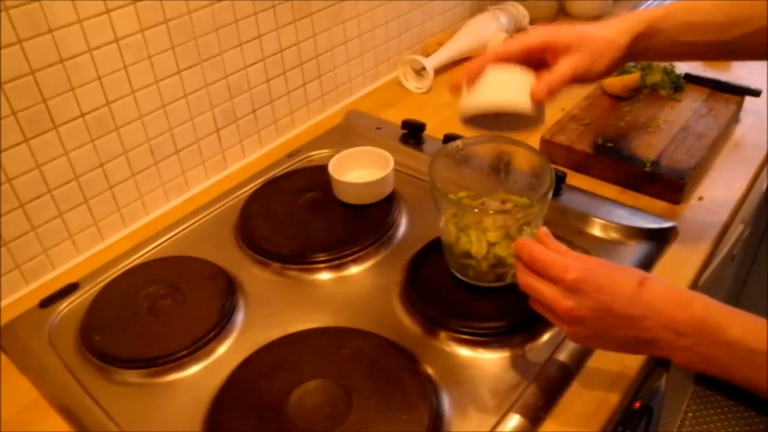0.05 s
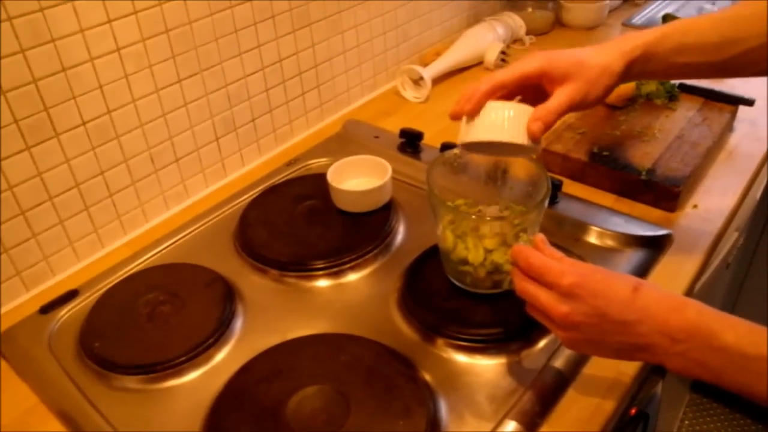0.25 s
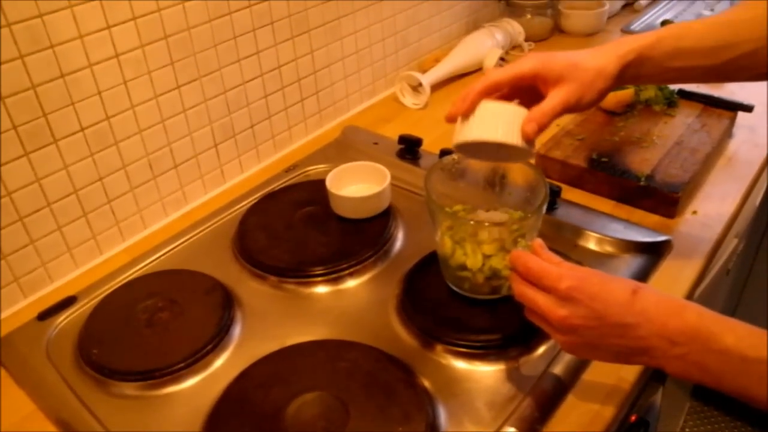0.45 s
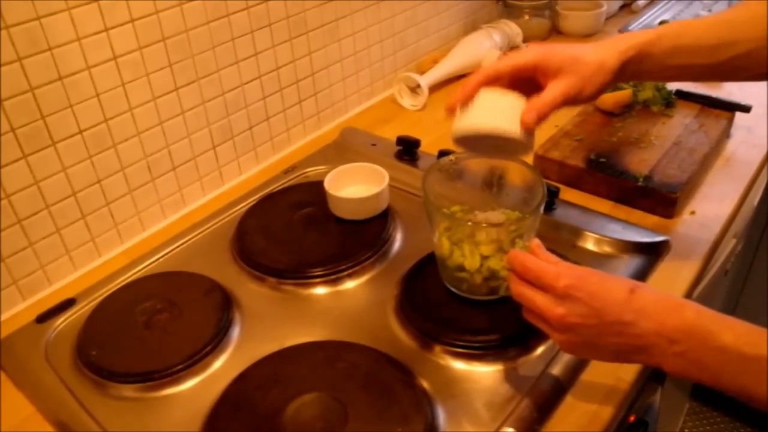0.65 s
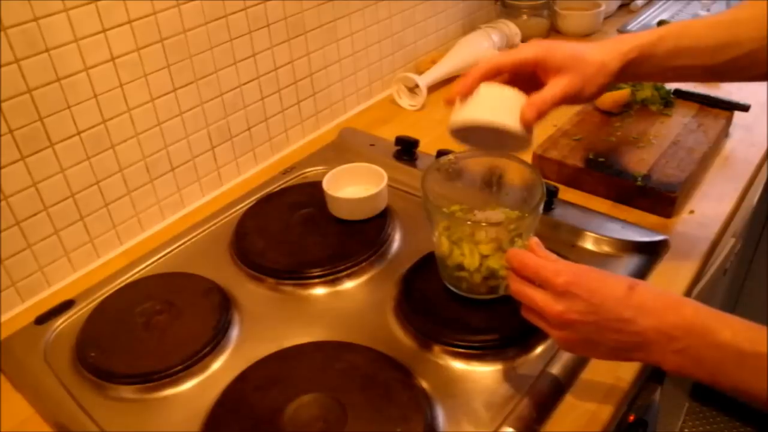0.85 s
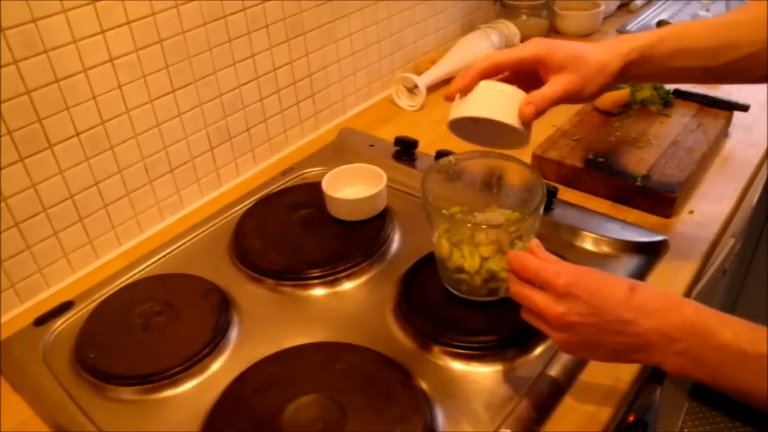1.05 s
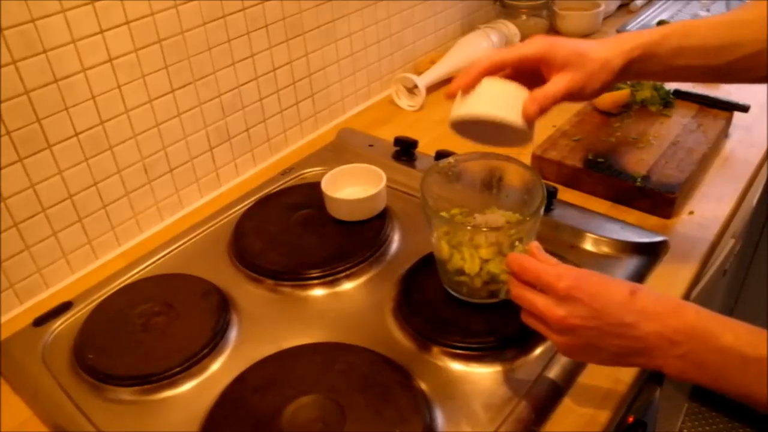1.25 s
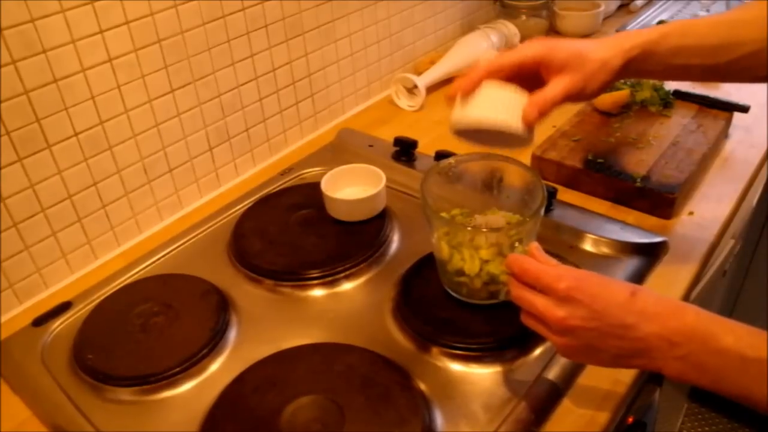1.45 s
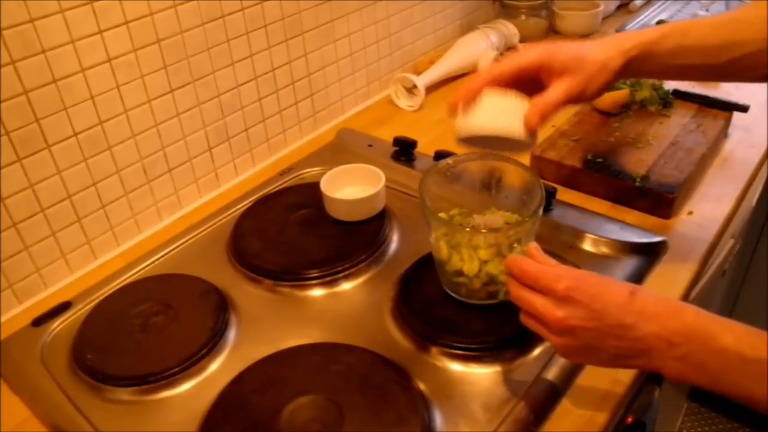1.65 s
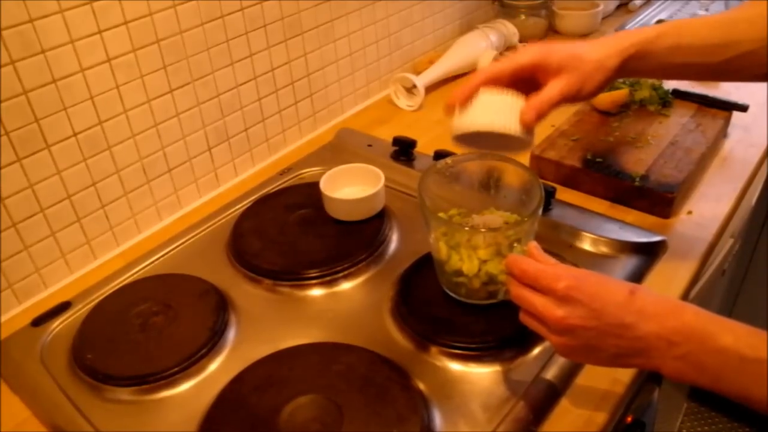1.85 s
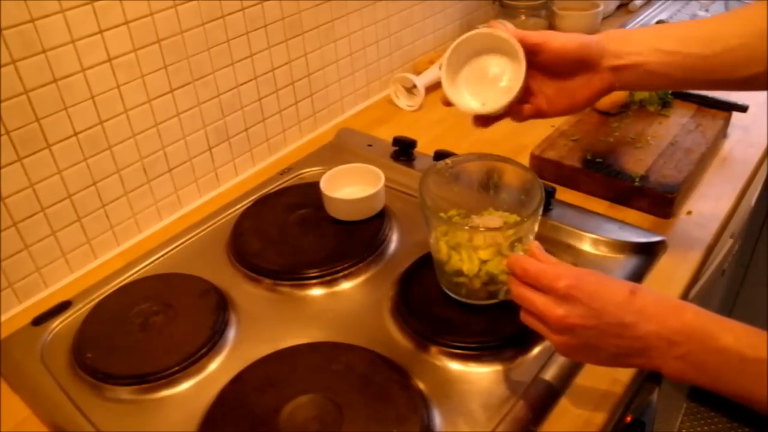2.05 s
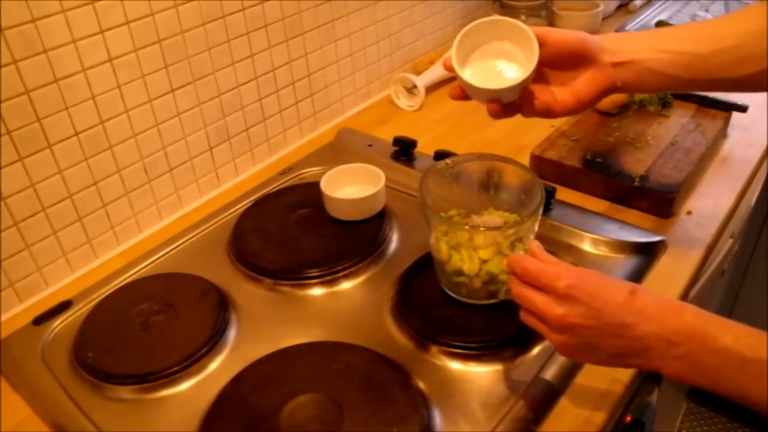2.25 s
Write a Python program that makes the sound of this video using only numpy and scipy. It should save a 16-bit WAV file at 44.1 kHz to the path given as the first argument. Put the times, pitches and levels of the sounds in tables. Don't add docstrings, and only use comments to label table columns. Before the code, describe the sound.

A small ceramic dish raps a glass jug's rim ten times at an even pace, each crack ringing bright; the jug clacks on the hob and contents patter. Small hard kitchen, close slightly clipped microphone.

```python
import sys
import numpy as np
from scipy import signal
from scipy.fft import rfft, irfft
from scipy.io import wavfile
from scipy.ndimage import uniform_filter1d

SR = 44100
rng = np.random.default_rng(int(sys.argv[2]) if len(sys.argv) > 2 else 0)


def attenuation_scalar(level_db):
    decades = np.asarray(level_db, float) / 20
    return 10 ** decades


def digitize_waveform(pressure):
    field = np.atleast_2d(pressure).T
    bounded = np.clip(field, -1, 1)
    quanta = np.round(bounded * 32767).astype(np.int16)
    wavfile.write(sys.argv[1], SR, quanta)


N = 101429
T = np.arange(N) / SR
RING_T = np.arange(SR // 2) / SR

# [t/s, crack level/dB, jug hum level/dB, middle ring level/dB, high ring level/dB]
TAPS = [
    (.2005, -34.5, -36, -50, -49.5),
    (0.3591, -35.5, -38.5, -53, -46.5),
    (.5445, -32, -36.5, -49.5, -43.5),
    (.732, -29.5, -37, -41.5, -41.5),
    (.914, -33.5, -37.5, -45.5, -47),
    (1.093, -35.5, -39.5, -51.5, -46),
    (1.270, -34.5, -37.5, -44, -46.5),
    (1.458, -35.5, -37, -55, -44),
    (1.636, -33, -37, -50.5, -47.5),
    (1.835, -38, -36.5, -55, -43),
]
# [hum t60/s, patter level/dB, patter peak after the knock/s]
AFTER = [
    (0.082, -51, 0.034),
    (0.11, -48.5, 0.03),
    (0.11, -51.5, 0.037),
    (0.13, -51, 0.037),
    (0.43, -52, 0.033),
    (0.33, -49, 0.027),
    (0.37, -50, .04),
    (0.49, -58.5, 0.032),
    (.48, -58, 0.013),
    (0.42, -55, 0.024),
]
# [f/Hz, level/dB, t60/s]
HOLLOW = [(525, -9, 0.082), (619, -18.5, 0.11), (679.4, -7, 0.1), (758, 4, 0.08), (826.7, 2.5, 0.044),
          (943, -4, 0.032), (1084, -5.5, 0.052), (1405, 7, 0.036), (1551.4, 3.5, 0.066)]
# [f/Hz, level/dB, t60/s]
HOLLOW_TOP = [(1760, -3, 0.017), (2020, 5, 0.025), (2210, 6.5, 0.018), (2490, -6, .02), (2720, -49, 0.0069),
              (3560, -4, 0.013), (4040, -6.5, 0.014)]
# [f/Hz, level per Hz/dB]
CRACK = [(300, -18), (1100, 2.5), (2200, 2.5), (4400, 0), (5400, -7), (8200, -0.5), (8700, -15),
         (13000, -25)]
SCATTER_DB, FLUTTER_DB = 2, 3.5


def level(x, db):
    return x * attenuation_scalar(db) / np.sqrt(np.mean(x ** 2))


def colour(x, points):
    hz, db = np.array(points).T
    log_hz = np.log(np.fft.rfftfreq(len(x), 1 / SR) + 1)
    return irfft(rfft(x) * attenuation_scalar(np.interp(log_hz, np.log(hz), db)), len(x))


def ring(modes, scatter_db=0., flutter_db=0.):
    hz, db, t60 = np.array(modes).T[:, :, None]
    chance = rng.standard_normal((len(modes), 102))
    flutter_per_s = 150
    flutter = np.array([np.interp(RING_T * flutter_per_s, np.arange(100), row[2:]) for row in chance])
    gain = attenuation_scalar(db + scatter_db * chance[:, :1] + flutter_db * flutter - 60 * RING_T / t60)
    return np.sum(gain * np.sin(2 * np.pi * hz * RING_T) * np.sign(chance[:, 1:2]), axis=0)


def add(out, s, x):
    i = int(s * SR)
    out[i:i + len(x)] += x[:N - i]


def walk(rate):
    k = int(SR / rate)
    return level(uniform_filter1d(uniform_filter1d(rng.standard_normal(N), k), k), 0)


def hush():
    # [f/Hz, level per Hz/dB]
    tone_points = [(20, -3), (60, -12), (160, 1), (300, -4), (420, -10), (1000, -12.5), (12500, -27.5),
                   (15500, -38)]
    # [t/s, level/dB]
    drone_points = [(0, -79.5), (1.45, -74.5), (1.6, -66.5), (1.848, -75.5), (2.3, -68.5)]
    drone_hz, drone_width_hz, flicker_db = 222, 25, 2
    peak = signal.iirpeak(drone_hz, drone_hz / drone_width_hz, fs=SR)
    drone = signal.lfilter(*peak, rng.standard_normal(N))
    drone_db = np.interp(T, *np.array(drone_points).T) + flicker_db * walk(17.4)
    tone = level(colour(rng.standard_normal(N), tone_points), -70.5) * attenuation_scalar(0.27 * walk(18))
    return tone + level(drone, 0) * attenuation_scalar(drone_db)


def room(x):
    t60_s, top_t60_s, split_hz, tail_db, gap_s = 0.32, 0.29, 1440, -10.5, 0.0075
    noise = rng.standard_normal(len(RING_T))
    low = signal.lfilter(*signal.butter(1, split_hz, fs=SR), noise)
    tail = low * attenuation_scalar(-60 * RING_T / t60_s) + (noise - low) * attenuation_scalar(-60 * RING_T / top_t60_s)
    tail = tail * (RING_T > gap_s)
    return signal.fftconvolve(x, tail * attenuation_scalar(tail_db) / np.sqrt(np.sum(tail ** 2)))[:N]


def hob():
    # [f/Hz, level/dB, t60/s]
    plate = [(104.7, -7, 0.19), (150.6, -0.5, 0.24), (201, -2.5, .2), (287, 3, .15), (394, -6, .1)]
    boom_db, rise_s = -65.5, 0.026
    out = np.zeros(N)
    swell = 1 - np.exp(-RING_T / rise_s)
    for tap in TAPS:
        add(out, tap[0], attenuation_scalar(boom_db) * ring(plate, SCATTER_DB, FLUTTER_DB) * swell)
    return out


def rocks():
    # [t/s, level/dB, brightness/dB]
    landings = [(.246, -47, 3), (.267, -46, -22), (.393, -44, 3.5), (.412, -41, 1.5), (.589, -38, 4.5),
                (.606, -41, -13), (.797, -44, -1.5), (.975, -48, -21), (1.129, -55, -11), (1.322, -55, 5),
                (1.675, -45.5, -23), (2.243, -96, -8)]
    contact_s, scrape_db, scrape_t60_s = 0.00075, -11, .06
    out = np.zeros(N)
    soft = 1 - np.exp(-RING_T / contact_s)
    dull = list(CRACK[:4]) + [(6000, -42)]
    for s, db, top_db in landings:
        scrape = level(colour(rng.standard_normal(len(soft)), dull), db + top_db + scrape_db)
        add(out, s, scrape * attenuation_scalar(-60 * RING_T / scrape_t60_s))
        body = ring(HOLLOW, SCATTER_DB, FLUTTER_DB)
        body = body + attenuation_scalar(top_db) * ring(HOLLOW_TOP, SCATTER_DB, FLUTTER_DB)
        add(out, s, attenuation_scalar(db - 10) * soft * body)
    return out


def patter():
    grains_per_s, spread_db, sharpness, top_db = 1300, 2, 1.93, -4
    swell = 0
    for tap, (_, db, peak_s) in zip(TAPS, AFTER):
        age = np.maximum(T - tap[0], 0) / peak_s
        swell = swell + attenuation_scalar(db) * (age * np.exp(1 - age)) ** sharpness
    draw = rng.random((3, N))
    force = attenuation_scalar(-spread_db * np.log(draw[2] + 1e-9))
    grains = (draw[0] < grains_per_s / SR) * np.sign(draw[1] - .5) * force
    body = ring(HOLLOW) + attenuation_scalar(top_db) * ring(HOLLOW_TOP)
    return level(signal.fftconvolve(grains, body), 0)[:N] * swell


def hum():
    hum_hz, grip_shift_hz_s = 1499, 1.5
    rise_s, settle_s, flutter_db = .006, .04, 1.5
    hold_share = .11
    out = np.zeros(N)
    for tap, (t60, _, _) in zip(TAPS, AFTER):
        shudder_db = flutter_db / (2 * t60) * np.exp(-RING_T / settle_s)
        note = ring([(hum_hz + grip_shift_hz_s / t60, tap[2], t60)], flutter_db=shudder_db)
        hold = attenuation_scalar(60 * np.minimum(RING_T / t60, hold_share))
        add(out, tap[0], note * hold * (1 - np.exp(-RING_T / rise_s)))
    return out


def taps():
    middle_hz = [1188, 1960, 2099, 3575, 3612, 3661, 4398, 4786]
    # [level/dB, t60/s]
    middle_decay = [(-23, .5), (-9, .1), (-7, .11), (0, .23), (-7, .14), (-12, .18), (-13, .04), (-14, .05)]
    high_hz = [6351, 6375, 6837, 7658, 7812, 8344, 9110, 10030, 11060]
    # [level/dB, t60/s]
    high_decay = [(0, .15), (-6, .13), (-18, .07), (-18, .26), (-9, .12), (-14, .12), (-22, .06),
                  (-25, .14), (-11, .13)]
    crack_t60_s = 0.031
    out = np.zeros(N)
    middle = np.column_stack([middle_hz, middle_decay])
    high = np.column_stack([high_hz, high_decay])
    for s, crack_db, _, mid_db, high_db in TAPS:
        crack = level(colour(rng.standard_normal(len(RING_T)), CRACK), crack_db)
        add(out, s, crack * attenuation_scalar(-60 * RING_T / crack_t60_s))
        add(out, s, attenuation_scalar(mid_db) * ring(middle, SCATTER_DB, FLUTTER_DB))
        add(out, s, attenuation_scalar(high_db) * ring(high, SCATTER_DB, FLUTTER_DB))
    return out


def scene():
    body_low_hz, input_db = 405, 1
    thin = signal.butter(4, body_low_hz, "high", fs=SR, output="sos")
    near = signal.sosfilt(thin, taps() + patter() + rocks())
    return (attenuation_scalar(input_db) * (near + room(near)) + hum() + hob())[None]


def starve(x):
    # [t/s, length/s, above f/Hz, kept range level/dB]
    moments = [
        (.105, .016, 2500, -6),
        (.147, .018, 2500, -8),
        (.255, .018, 2500, -28),
        (.468, .016, 2500, -14),
        (.533, .022, 1800, 0),
        (1.163, .04, 100, -24),
        (1.525, .04, 400, -30),
        (1.898, .014, 2000, -40),
        (2.05, .016, 400, -20),
    ]
    lost = np.zeros(N)
    for s, length, above_hz, keep_db in moments:
        n = int(2 * length * SR)
        start = int(s * SR) - n // 2
        fade = np.sqrt(signal.windows.tukey(n, .7))
        bins = rfft(x[start:][:n] * fade)
        power = uniform_filter1d(np.abs(bins) ** 2, size=5)
        weak = (power < power.max() * attenuation_scalar(2 * keep_db)) & (np.fft.rfftfreq(n, 1 / SR) > above_hz)
        add(lost, (start + .5) / SR, irfft(bins * weak, n) * fade)
    return x - lost


def band_limit(x):
    return signal.sosfilt(signal.butter(12, 15300, fs=SR, output="sos"), x)


def record(dry):
    clip, knee, lopsided, sound_top_hz, offset = .022, 5, 3., 12900, .0017
    x = dry[0] / (1 + np.abs(dry[0] / clip) ** knee) ** (1 / knee)
    x = x - lopsided * x ** 2
    x = signal.sosfilt(signal.ellip(8, .1, 60, sound_top_hz, fs=SR, output="sos"), x)
    mix = starve(x + hush()) + offset
    return band_limit(mix[None])


dry = scene()
out = record(dry)
digitize_waveform(out)
```